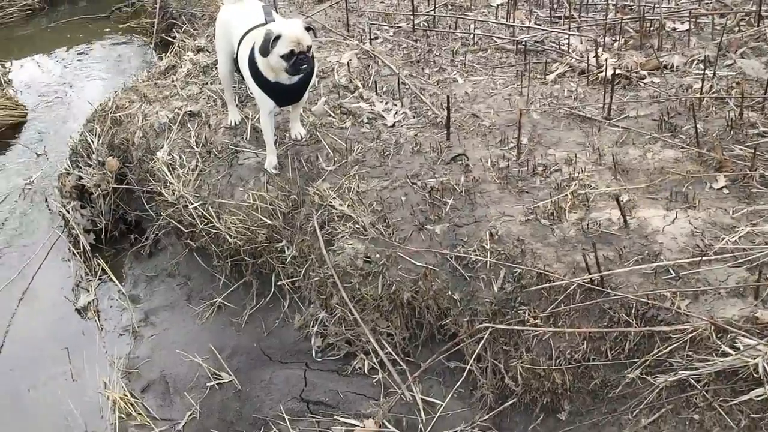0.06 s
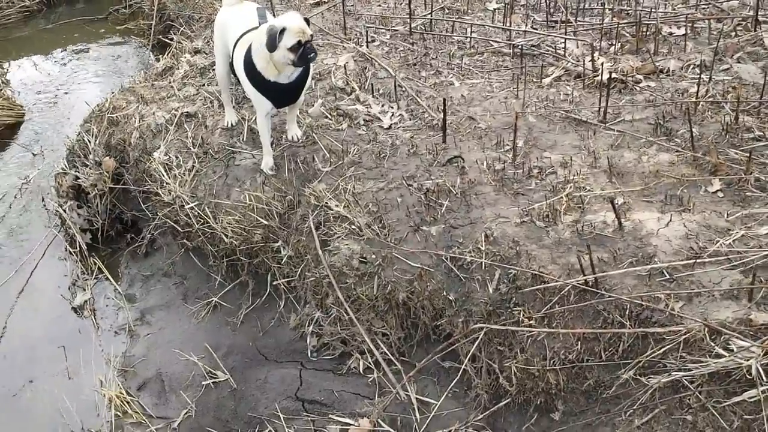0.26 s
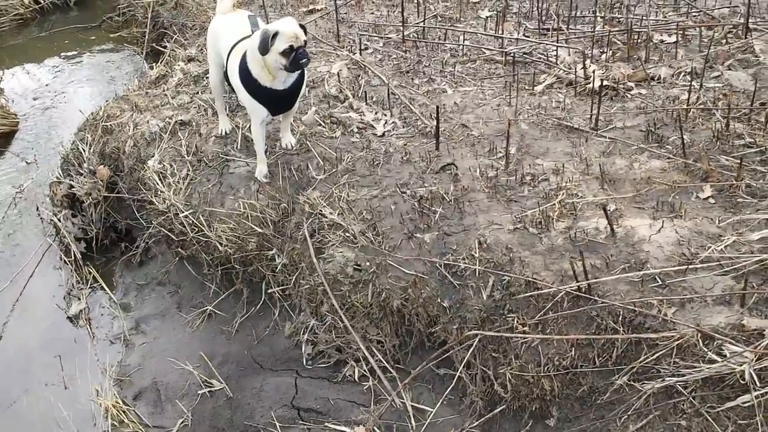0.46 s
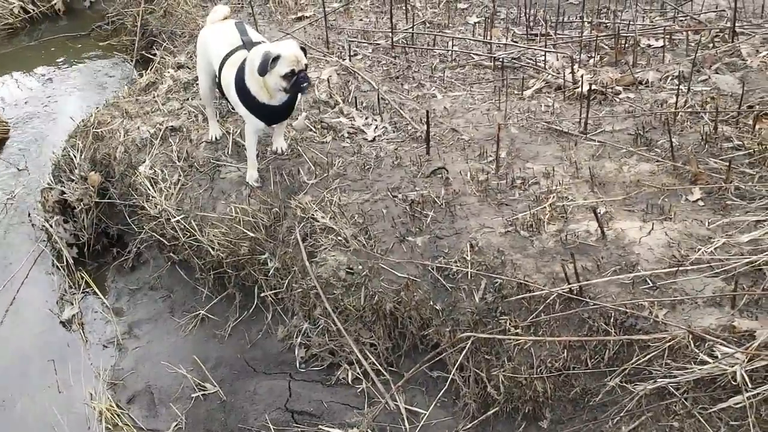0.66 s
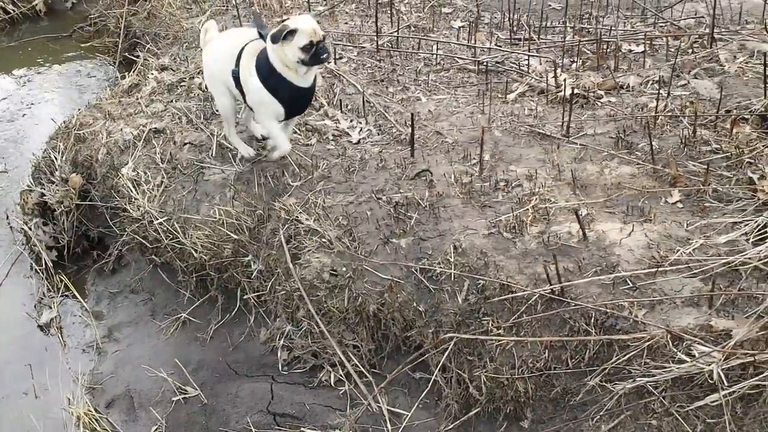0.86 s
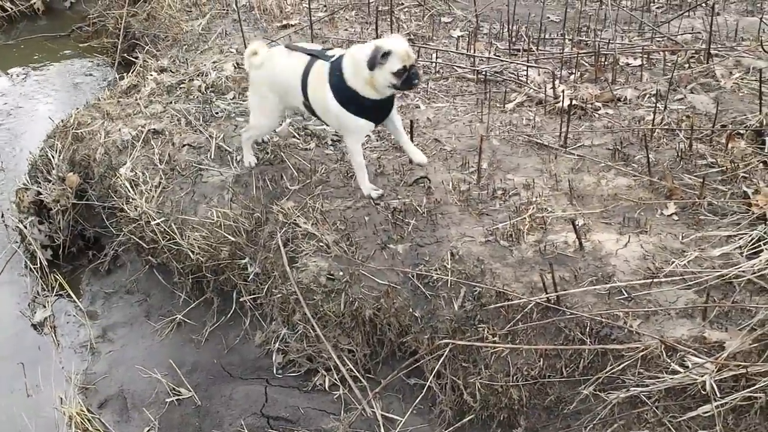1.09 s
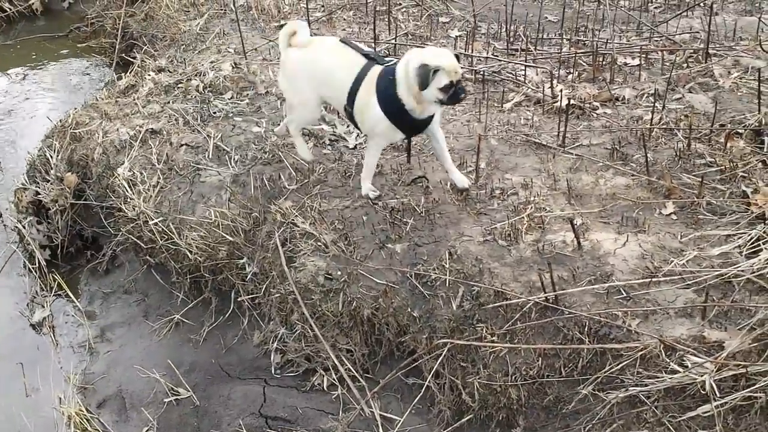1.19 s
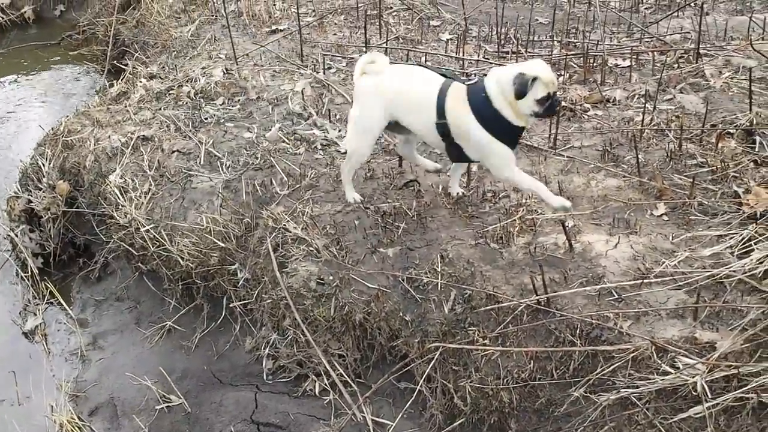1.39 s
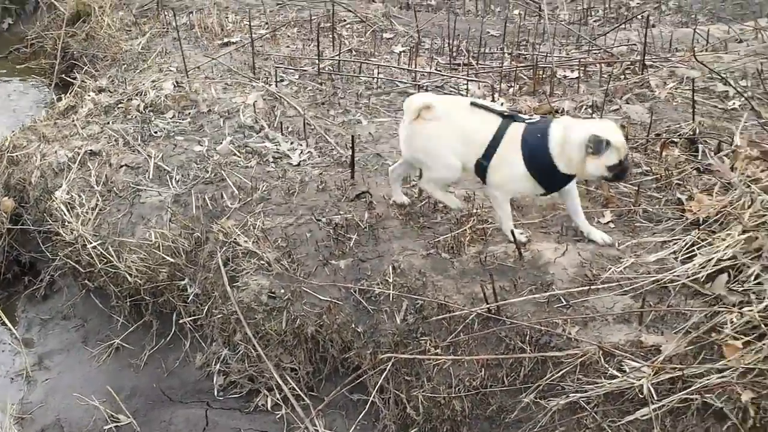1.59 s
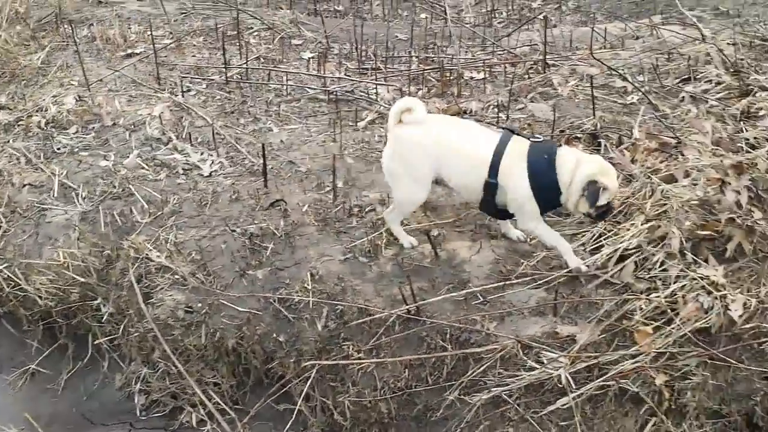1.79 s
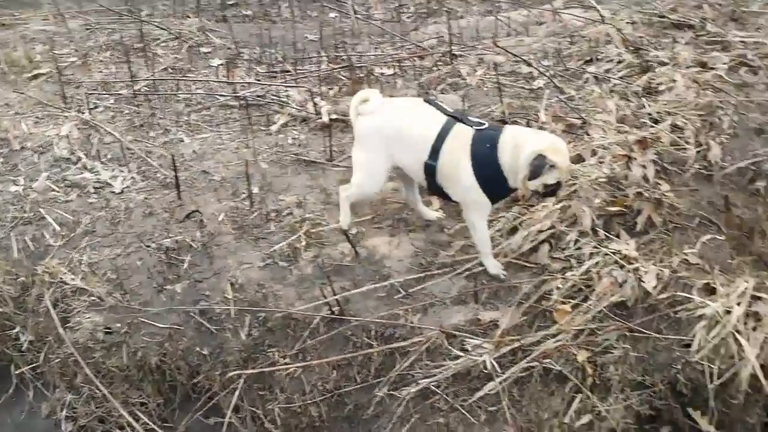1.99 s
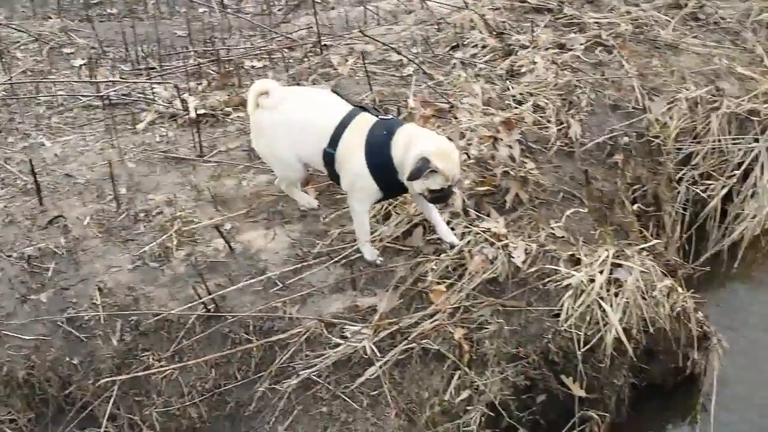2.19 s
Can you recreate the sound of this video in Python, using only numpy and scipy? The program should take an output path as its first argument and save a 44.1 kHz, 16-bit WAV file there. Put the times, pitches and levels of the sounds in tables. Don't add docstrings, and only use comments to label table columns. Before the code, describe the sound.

A small dog's steps rustle and crackle through dry reeds, light at first, then a dense burst of snaps near the end; low wind flutter hits the close hand-held phone microphone, with faint birds and distant water hiss.

```python
import sys
import numpy as np
from scipy import signal
from scipy.fft import rfft, irfft, next_fast_len
from scipy.io import wavfile
from scipy.ndimage import uniform_filter1d, map_coordinates

SR = 44100
rng = np.random.default_rng(int(sys.argv[2]) if len(sys.argv) > 2 else 0)


def elevation(decibels):
    levels = np.asarray(decibels, float)
    return 10 ** (levels / 20)


def master(y):
    cut = np.clip(np.atleast_2d(y).T, -1, 1)
    pcm = np.round(cut * 32767)
    wavfile.write(sys.argv[1], SR, pcm.astype(np.int16))


N = 99225


def unit(x):
    return x / np.sqrt(np.mean(x ** 2, axis=-1, keepdims=True) + 1e-20)


def curves(rows):
    s, *cols = np.transpose(rows)
    return np.array([np.interp(np.arange(N) / SR, s, c) for c in cols])


def wobble(knots_per_s):
    return map_coordinates(rng.standard_normal(N // 20), [np.arange(N) * knots_per_s / SR])


def filtered(x, response):
    m = next_fast_len(N + 8192)
    return irfft(rfft(x, m) * response(np.fft.rfftfreq(m, 1 / SR)), m)[..., :N]


def coloured(x, points):
    f, db = np.transpose(points)

    def gain(hz):
        return elevation(np.interp(np.log(hz + 1), np.log(f), db)) * (hz > f[0] / 2)

    return filtered(x, lambda hz: gain(hz) / np.sqrt(np.mean(gain(hz) ** 2)))


def add(track, s, sound):
    part = track[..., round(s * SR):][..., :sound.shape[-1]]
    part += sound[..., :part.shape[-1]]


def sides(pan_db):
    return elevation([[pan_db / 2], [-pan_db / 2]])


def lagged(pair, count):
    return np.array([np.roll(pair[0], count), pair[1]])


def patchy(depth_db):
    z = signal.stft(rng.standard_normal((2, N)), nperseg=256)[2]
    field = rng.standard_normal(z.shape[1:])
    field = uniform_filter1d(field, size=12, axis=0)
    field = uniform_filter1d(field, size=3, axis=1)
    z = z * elevation(depth_db * field / field.std())
    return unit(signal.istft(z, nperseg=256)[1][:, :N])


# t/s, effort/dB
BRUSH_EFFORT = [(.66, -93), (.73, -61), (.82, -49), (.87, -65), (1.13, -65), (1.16, -53.5), (1.21, -69),
                (1.29, -46.5), (1.35, -62.5), (1.73, -62.5), (1.86, -57.5), (1.875, -41.5), (1.935, -40),
                (1.99, -40), (2.03, -44), (2.095, -54), (2.11, -48.5), (2.19, -44.5), (2.25, -46.5)]
GRAINS_PER_S, GRAIN_SPREAD_DB, GRAIN_T60_S = 4600, 3.3, 0.003
SWISH_DB, SURGE_DB = 0, 1


def brushing():
    hit = rng.random(N) < GRAINS_PER_S / SR
    size = elevation(GRAIN_SPREAD_DB * np.minimum(rng.exponential(size=N), 4))
    decay = elevation(-60 * np.arange(400) / SR / GRAIN_T60_S)
    grains = unit(signal.fftconvolve(hit * size, decay)[:N])
    effort = elevation(curves(BRUSH_EFFORT)[0] + SURGE_DB * wobble(45.43))
    return effort * (grains + elevation(SWISH_DB)) / 2 * patchy(depth_db=2.5)


# t/s, peak/dB, lowest f/Hz
SNAP_EVENTS = [(.821, -39, 6000), (.9155, -52, 5500), (.957, -53, 5500), (1.16, -48, 2000),
               (1.2545, -45, 4500), (1.2904, -34, 900), (1.3173, -41, 1200), (1.6187, -33, 4000),
               (1.695, -46, 4200), (1.7209, -40, 4000), (1.733, -42, 3000), (1.7723, -39, 1500),
               (1.8848, -29, 3500), (1.8895, -28, 3500), (1.8935, -24, 1500), (1.9165, -28, 3500),
               (1.927, -31, 3500), (1.932, -28, 1000), (1.943, -35, 4000), (1.969, -31, 2000),
               (1.986, -33, 4000), (1.992, -34, 3000), (2.011, -36, 3000), (2.107, -42, 4000),
               (2.135, -43, 3500), (2.1525, -44, 3500), (2.2198, -39, 800)]
SNAP_TOP_HZ, SNAP_RISE_S, SNAP_T60_S, SNAP_DB = 13500, 0.0005, 0.015, 2


def snaps():
    out, t = np.zeros((2, N)), np.arange(SR // 10) / SR
    for s, db, low_hz in SNAP_EVENTS:
        band = signal.butter(2, [low_hz, SNAP_TOP_HZ], "band", fs=SR)
        crack = signal.lfilter(*band, rng.standard_normal((2, len(t))))
        add(out, s, crack * elevation(db + SNAP_DB - 60 * t / SNAP_T60_S) * np.minimum(t / SNAP_RISE_S, 1))
    return out


# f/Hz, level/dB per Hz
STEM_COLOUR_LEFT = [(700, -8.5), (2400, -4), (3300, -6.5), (5100, 4), (7200, 6), (9400, -20), (11300, -8.5),
                    (14300, -4)]
# f/Hz, level/dB per Hz
STEM_COLOUR_RIGHT = [(700, -11.5), (2400, -2), (3600, -11), (5150, 7.5), (6200, -10.5), (8500, -3.5),
                     (9900, -8.5), (14300, -6)]
STEMS_ALIKE, STEM_LAG_SAMPLES = 0.4, -5


def stems():
    a, b = brushing() + snaps()
    u = np.arccos(STEMS_ALIKE) / 2
    left = np.cos(u) * a + np.sin(u) * b
    right = np.cos(u) * a - np.sin(u) * b
    pair = np.array([coloured(left, STEM_COLOUR_LEFT), coloured(right, STEM_COLOUR_RIGHT)])
    return lagged(pair, count=STEM_LAG_SAMPLES)


# t/s, peak/dB, thud f/Hz, rattle/dB, left minus right/dB
CASE_KNOCKS = [
    (0.035, -29.5, 630, -22, 29),
    (1.549, -29.5, 574, -34, 14),
    (1.8279, -19.5, 332, -4.5, -42),
    (1.867, -42, 890, 0.5, -42),
    (2.041, -33.5, 454, -2, -9),
]
KNOCK_CYCLES, CASE_RATIO, CASE_DB = 0.74, 3.79, 2.5
RATTLE_T60_S, RATTLE_RISE_S = 0.044, 0.0014
FLICK_S, FLICK_DB, FLICK_HZ, FLICK_PAN_DB = 1.8675, -13, 4000, -32


def knocks():
    out, t = np.zeros((2, N)), np.arange(SR // 10) / SR
    for s, db, hz, rattle_db, pan_db in CASE_KNOCKS:
        second = elevation(CASE_DB + rattle_db) * np.sin(2 * np.pi * CASE_RATIO * hz * t)
        thud = -(np.sin(2 * np.pi * hz * t) + second) * elevation(-20 * t * hz / KNOCK_CYCLES)
        rattle = uniform_filter1d(rng.standard_normal(len(t)), size=3)
        rattle = rattle * elevation(rattle_db - 60 * t / RATTLE_T60_S) * np.minimum(t / RATTLE_RISE_S, 1)
        add(out, s, elevation(db - abs(pan_db) / 2) * sides(pan_db) * (thud + rattle))
    cycle = t[t < 1 / FLICK_HZ] * FLICK_HZ
    flick = np.sin(2 * np.pi * cycle) * np.sin(np.pi * cycle)
    add(out, FLICK_S, elevation(FLICK_DB - abs(FLICK_PAN_DB) / 2) * sides(FLICK_PAN_DB) * flick)
    return out


# t/s, level/dB, half length/s, throb f/Hz
PORT_EDDIES = [(0.22, -35.5, 0.0035, 69), (0.238, -31, 0.011, 95), (0.306, -26.5, 0.015, 105),
               (0.339, -29, 0.004, 108), (0.472, -29, 0.009, 110), (0.503, -25.5, 0.0037, 108),
               (0.539, -27.5, 0.011, 80), (.587, -28, 0.018, 65.5), (0.605, -27.5, 0.0063, 67),
               (0.638, -29.5, 0.0026, 95), (0.693, -25.5, 0.0075, 102), (0.718, -30.5, 0.013, 69.4),
               (0.7478, -24.5, 0.0028, 225), (.7575, -16.5, 0.0026, 106), (0.7724, -18, 0.0017, 292),
               (0.769, -34.5, 0.0018, 552), (0.782, -23, 0.0082, 92), (0.8055, -27.5, 0.011, 126),
               (.831, -26.5, 0.0066, 124), (.832, -33, 0.0017, 405), (0.8447, -23.5, 0.0021, 250),
               (0.8512, -18.5, 0.0079, 66), (0.873, -39, 0.014, 80), (0.9, -24.5, 0.0032, 97),
               (0.339, -31, 0.0019, 256), (0.468, -36.5, 0.0037, 231), (0.585, -41.5, 0.0024, 206),
               (.631, -33.5, 0.0037, 191), (1.23, -37.5, 0.0052, 60), (0.977, -40.5, 0.0094, 66.5),
               (1.044, -35.5, 0.01, 72), (1.143, -36, 0.0098, 98), (1.299, -50.5, 0.092, 79.8),
               (2.04, -54, 0.053, 75)]
# t/s, left level/dB, right level/dB
BREEZE_LEVELS = [(0, -52.5, -56), (.1, -45.5, -60), (.3, -56.5, -38.5), (.5, -50.5, -56), (.8, -52, -30),
                 (1, -48.5, -51.5), (1.22, -55.5, -51), (1.45, -57, -59), (1.8, -60.5, -55),
                 (2.25, -56, -53.5)]
# f/Hz, level/dB per Hz
RUMBLE_COLOUR = [(15, -24.5), (55, 0), (110, 1), (200, -12.5), (400, -33.5), (900, -45)]
# f/Hz, level/dB per Hz
FLUTTER_COLOUR = [(60, -25), (180, 16), (330, -11.5), (600, -26), (1200, -43)]
LUMPS_DB, TUMBLE_DB = 2.5, -13
FLUTTER_DB, FLUTTER_GROWS = -14, 1.44


def evened(x):
    return x / np.sqrt(np.abs(uniform_filter1d(x ** 2, size=900)) + 0.027)


def wind():
    t = np.arange(N) / SR
    right_only = np.array([[0], [1]])
    lumps = np.array([wobble(24.94), wobble(24.7)])
    breeze = elevation(curves(BREEZE_LEVELS) + LUMPS_DB * lumps)
    drift = np.cumsum(60 * wobble(58.77)) / SR
    throb, power = np.zeros(N), np.zeros(N)
    for s, db, half_s, hz in PORT_EDDIES:
        swirl = elevation(db) * np.exp(-((t - s) / half_s) ** 2 / 2)
        phase = 2 * np.pi * hz * (t - s) + drift - drift[round(s * SR)]
        throb -= swirl * np.sqrt(2) * np.cos(phase)
        power += swirl ** 2
    gust = right_only * np.sqrt(power)
    low = evened(coloured(rng.standard_normal((2, N)), RUMBLE_COLOUR))
    high = evened(coloured(rng.standard_normal((2, N)), FLUTTER_COLOUR))
    flutter = elevation(FLUTTER_DB - 26.5) * ((breeze + gust) / elevation(-27.0)) ** FLUTTER_GROWS * high
    return (breeze + elevation(TUMBLE_DB) * gust) * low + right_only * throb + flutter


FADING_DB, NOTE_ROUND = 2.5, 0.3


def whistles(notes, pan_db, quaver_hz, burr_db, quavers_per_s):
    out = np.zeros((2, N))
    quaver = quaver_hz * wobble(quavers_per_s)
    fading = FADING_DB * np.array([wobble(39.05), wobble(39.4)])
    burr = burr_db * wobble(180)
    for s, length_s, first_hz, glide_hz, db in notes:
        u = np.linspace(0, 1, round(length_s * SR))
        s = max(s, 0)
        hz = first_hz + glide_hz * np.sin(u * np.pi / 2) + quaver[round(s * SR):][:len(u)]
        swell = np.abs(np.sin(np.pi * u)) ** NOTE_ROUND
        add(out, s, elevation(db + 9) * swell * np.sin(2 * np.pi * np.cumsum(hz) / SR))
    return out * elevation(fading + burr) * sides(pan_db)


# f/Hz, width/Hz, left level/dB, right level/dB
RASP_PARTIALS = [
    (4180, 1000, -53.5, -56.5),
    (6100, 360, -49.5, -56.5),
    (11600, 640, -67, -70),
]
RASP_S, RASP_LENGTH_S, RASP_SKEW, RASP_ROUND = 0.655, 0.22, 1.5, 0.7


def rasp():
    u = np.clip((np.arange(N) / SR - RASP_S) / RASP_LENGTH_S, 0, 1)
    swell = np.abs(np.sin(np.pi * u ** RASP_SKEW)) ** RASP_ROUND * elevation(0.53 * wobble(121.7))
    out = np.zeros((2, N))
    for hz, width_hz, left_db, right_db in RASP_PARTIALS:
        noise = rng.standard_normal((2, N))
        band = unit(filtered(noise, lambda f: np.exp(-((f - hz) / width_hz) ** 2)))
        out += elevation([[left_db], [right_db]]) * band
    return swell * out


# t/s, length/s, first f/Hz, glide/Hz, level/dB
LEFT_WHISTLES = [(.071, 0.012, 5700, -600, -72), (.087, 0.047, 6400, 1000, -67.5),
                 (.127, .012, 6400, 600, -72), (.167, 0.038, 6300, 750, -66.5), (.003, .045, 6400, 50, -73),
                 (.897, 0.085, 5400, 70, -68), (.995, .045, 5500, -20, -69), (.985, 0.07, 3980, 200, -68),
                 (1.335, 0.055, 5400, 10, -71), (.52, .06, 3900, 80, -75), (1.636, 0.035, 4630, 7, -73),
                 (2.051, 0.19, 5660, 290, -70)]
# t/s, length/s, first f/Hz, glide/Hz, level/dB
RIGHT_WHISTLES = [(.001, 0.075, 4450, -100, -75), (.005, .03, 2700, 80, -74), (.06, 0.06, 2900, -80, -72),
                  (.085, 0.05, 4230, 100, -72), (.135, 0.16, 4150, 330, -70),
                  (.301, 0.23, 2930, -150, -77.5), (.601, 0.017, 5450, -200, -76),
                  (.916, 0.025, 5300, -150, -61), (1.215, .025, 4150, -20, -70),
                  (1.246, .022, 4150, -20, -60), (1.27, .04, 4100, -50, -67), (1.311, 0.066, 3984, 40, -62),
                  (1.451, 0.11, 2750, -150, -76), (1.531, 0.033, 4100, 806, -70.5),
                  (1.751, 0.04, 3700, 15, -74), (2.065, 0.03, 3660, 10, -72)]
# t/s, length/s, first f/Hz, glide/Hz, level/dB
HOARSE_CHIRPS = [(.128, .008, 2600, -400, -68), (.204, .013, 1750, 300, -62), (.8, .03, 5400, 10, -65),
                 (.845, .06, 4050, -30, -63), (.918, .078, 2650, -180, -63), (.94, .04, 3050, 50, -69),
                 (1.022, .01, 2250, 10, -66), (1.063, .068, 4560, 120, -62), (1.143, .045, 5500, 200, -65),
                 (1.15, .025, 2600, 200, -69), (1.183, .027, 5600, -2600, -68),
                 (1.26, .02, 3700, -500, -66), (1.431, 0.016, 5200, -1300, -68),
                 (1.576, 0.05, 4300, -1300, -72), (1.72, .04, 3300, -300, -73)]
LEFT_PAN_DB, RIGHT_PAN_DB = 5, -2
LEFT_BIRD_LAG_SAMPLES, RIGHT_BIRD_LAG_SAMPLES = 6, 11
ECHO_DB, ECHO_T60_S = -6, 0.2


def birds():
    clear = dict(quaver_hz=50, burr_db=3.5, quavers_per_s=120)
    hoarse = dict(quaver_hz=170, burr_db=2.5, quavers_per_s=450)
    left = whistles(LEFT_WHISTLES, LEFT_PAN_DB, **clear)
    right = whistles(RIGHT_WHISTLES, RIGHT_PAN_DB, **clear)
    right = right + whistles(HOARSE_CHIRPS, RIGHT_PAN_DB, **hoarse) + rasp()
    direct = lagged(left, LEFT_BIRD_LAG_SAMPLES) + lagged(right, RIGHT_BIRD_LAG_SAMPLES)
    t = np.arange(SR // 3) / SR
    tail = rng.standard_normal((2, len(t))) * elevation(-60 * t / ECHO_T60_S)
    tail = tail / np.linalg.norm(tail[0])
    return direct + elevation(ECHO_DB) * signal.fftconvolve(direct, tail, axes=1)[:, :N]


# t/s, level/dB
HISS_LEVEL = [(0, -56.5), (.35, -55.5), (.6, -57), (1.2, -56), (1.5, -60), (2.25, -56.5)]
# f/Hz, level/dB per Hz
HISS_COLOUR_LEFT = [(150, 17.5), (700, 9), (1700, 4), (4500, 5), (7000, 4), (8800, -6), (11000, -4.5),
                    (14300, -4.5)]
# f/Hz, level/dB per Hz
HISS_COLOUR_RIGHT = [(150, 4.5), (700, 6), (1700, -4), (4500, 0), (7000, -6.5), (10000, -2.5),
                     (12000, -9.5), (14300, -8.5)]
HISS_SWAY_DB = 0.7


def hiss():
    left, right = rng.standard_normal((2, N))
    level = elevation(curves(HISS_LEVEL) + HISS_SWAY_DB * wobble(6.33))
    return level * np.array([coloured(left, HISS_COLOUR_LEFT), coloured(right, HISS_COLOUR_RIGHT)])


def scene():
    return stems() + knocks() + wind() + birds() + hiss()


def band_limit(x):
    return signal.sosfilt(signal.butter(12, 15870, fs=SR, output="sos"), x)


def record(dry):
    top_hz = 14230
    mix = filtered(dry, lambda hz: 1 / (1 + (hz / top_hz) ** 80))
    return band_limit(mix)


dry = scene()
out = record(dry)
master(out)
```